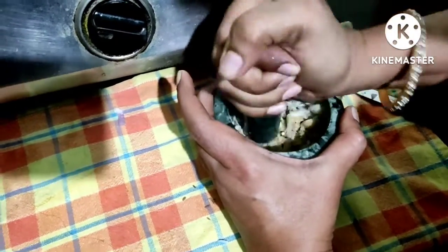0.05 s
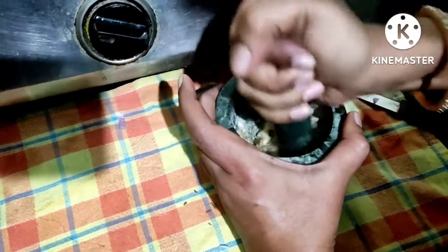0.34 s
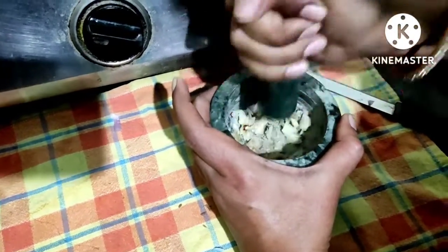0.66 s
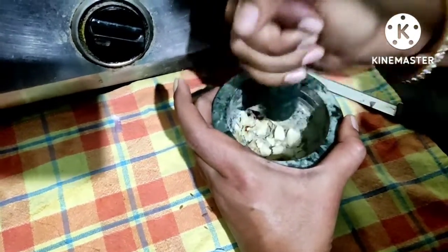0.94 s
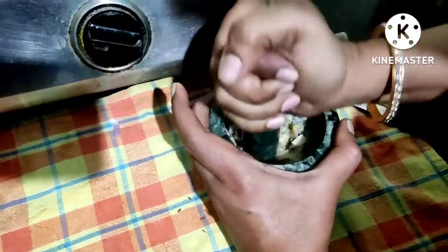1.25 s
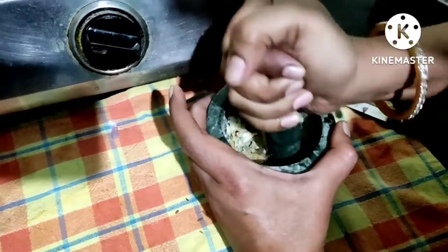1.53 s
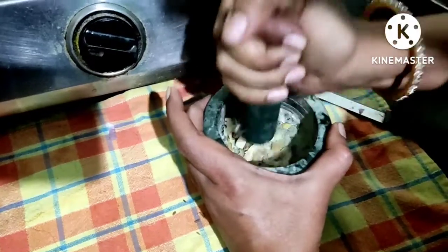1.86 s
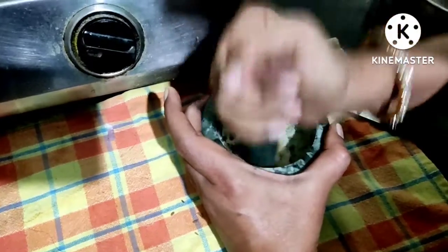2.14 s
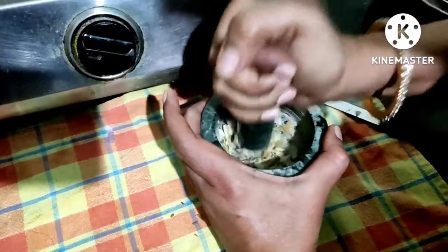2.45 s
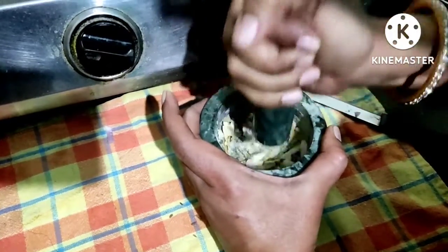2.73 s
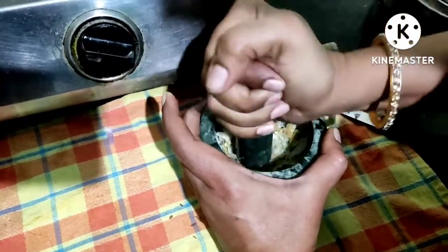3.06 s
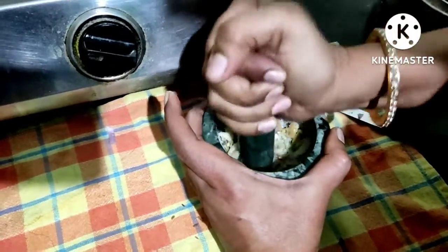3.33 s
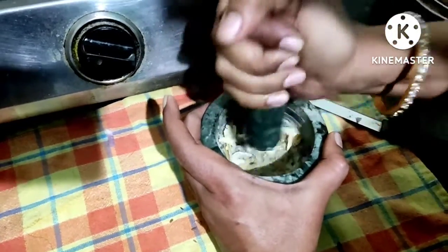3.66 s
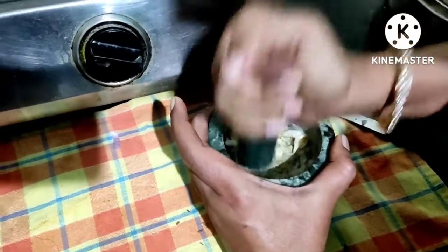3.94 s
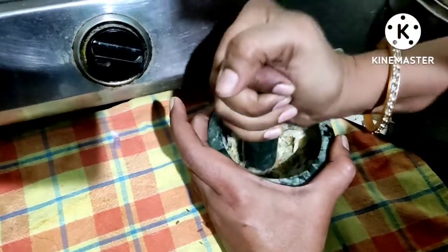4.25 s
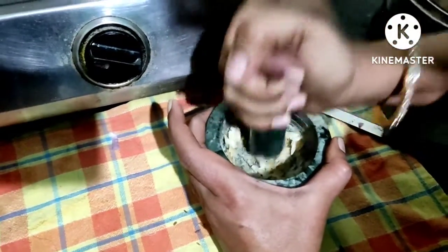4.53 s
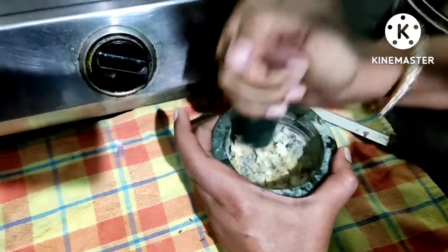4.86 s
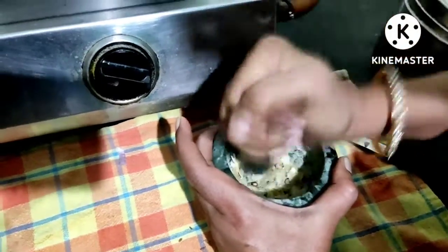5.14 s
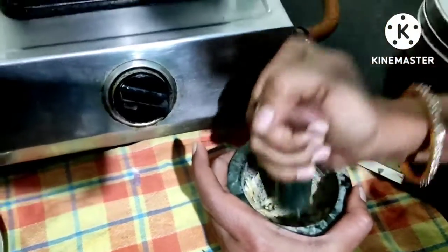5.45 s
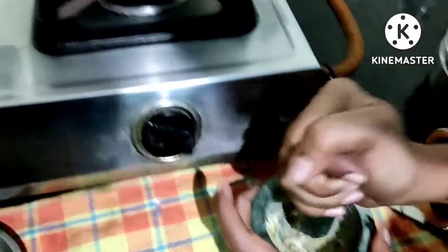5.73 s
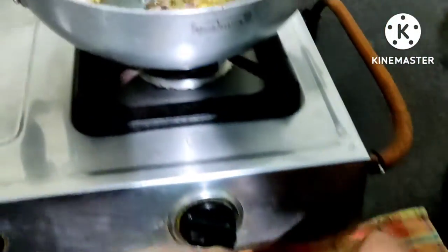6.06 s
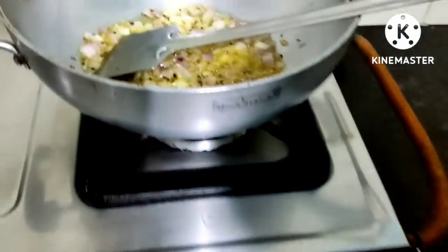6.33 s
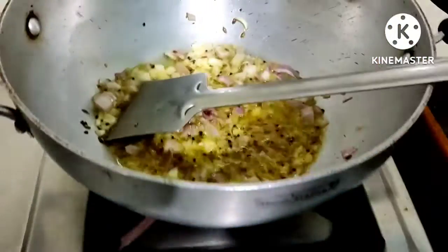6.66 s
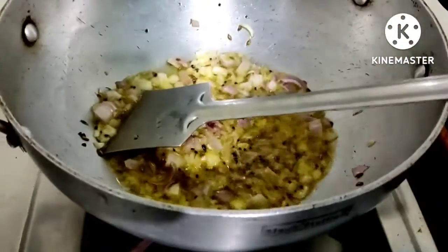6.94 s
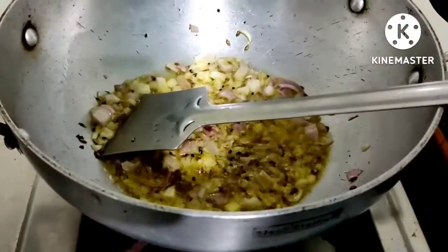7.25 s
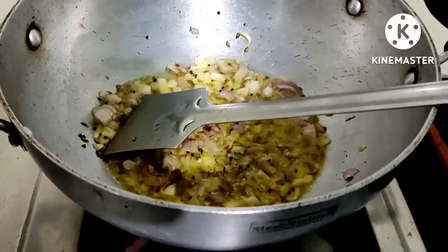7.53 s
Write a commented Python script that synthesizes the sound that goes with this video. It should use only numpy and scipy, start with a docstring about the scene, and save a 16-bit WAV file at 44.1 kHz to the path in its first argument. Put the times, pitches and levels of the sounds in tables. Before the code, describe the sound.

Close to a phone microphone in a small, hard-walled kitchen, garlic and ginger are crushed with a stone mortar and pestle in a quick, steady rhythm. Soft, moist thuds mix with sharper stone knocks, each leaving a short hollow ring. Onions fry quietly in oil in the background the whole time, growing slightly louder near the end as the pounding carries on over a faint low rumble.

```python
"""Thuds and wet squelches, about four a second: a stone pestle pounds garlic and ginger in a hand-held
stone mortar on a kitchen counter. Pulp cushions some blows; those that reach bare stone knock and clink,
and the small hard kitchen rings with them. Behind them onions sizzle in a pan over a low murmur of air.
It is all heard through a phone, whose limiter ducks everything after the hardest blows."""
import sys
import numpy as np
from scipy import signal
from scipy.fft import rfft, irfft
from scipy.io import wavfile
from scipy.ndimage import uniform_filter1d, minimum_filter1d

SR = 44100
rng = np.random.default_rng(int(sys.argv[2]) if len(sys.argv) > 2 else 0)


def materialize(psi):
    """Save the field psi as 16-bit PCM at rate SR to the path in sys.argv[1].

    A 1-D psi becomes a single channel; in a 2-D psi each row is a channel.
    """
    bounded = np.clip(np.atleast_2d(psi).T, -1, 1)
    quanta = np.round(bounded * 32767).astype(np.int16)
    wavfile.write(sys.argv[1], SR, quanta)


N = 343539
BLOW_T = np.arange(int(.6 * SR)) / SR  # seconds into one blow


def amp(db):
    """Decibels to gain."""
    return 10 ** (np.asarray(db) / 20)


def curve_at(points, hz):
    """Reads a curve drawn in straight lines over log frequency."""
    f, value = np.transpose(points)
    return np.interp(np.log(hz + 1), np.log(f), value)


def normalised(x):
    """Scales a short sound to the energy of 50 ms at level 1."""
    return x / np.sqrt(np.mean(np.sum(x ** 2, -1)) * 20 / SR)


def add(mix, s, sound):
    """Mixes a sound in at time s."""
    at = round(s * SR)
    sound = sound[:, max(-at, 0):]
    part = mix[:, max(at, 0):][:, :sound.shape[1]]
    part += sound[:, :part.shape[1]]


def delayed(x, s):
    """The same short sound, s seconds later."""
    return np.pad(x, ((0, 0), (round(s * SR), 0)))[:, :len(BLOW_T)]


def lowpass(x, hz):
    """Two-pole low-pass."""
    return signal.sosfilt(signal.butter(2, hz, fs=SR, output="sos"), x)


# how alike the two microphone ports hear a diffuse field: f/Hz, correlation
PORT_LIKENESS = [(30, 0.5), (80, 2), (130, 0.97), (300, 0.79), (640, 0.37), (1300, -0.12), (2200, 0.12),
                 (4000, 0)]
def diffuse(pair, spectrum):
    """Colours two unrelated signals and makes them as alike as a diffuse field does."""
    hz = np.fft.rfftfreq(pair.shape[1], 1 / SR)
    a, b = rfft(pair)
    likeness = np.clip(curve_at(PORT_LIKENESS, hz), -1, 1)
    mid, side = a * np.sqrt((1 + likeness) / 2), b * np.sqrt((1 - likeness) / 2)
    return irfft(np.array([mid + side, mid - side]) * amp(curve_at(spectrum, hz)), pair.shape[1])


def noise(spectrum, size):
    """Coloured stereo noise of level 1."""
    x = diffuse(rng.standard_normal((2, size)), spectrum)
    return x / x.std()


def ring(modes, rise_s, shift=1, sustain=1):
    """Dying sines; each reaches the two ports out of step by its own angle."""
    out = np.zeros((2, len(BLOW_T)))
    for k, (hz, db, t60) in enumerate(modes):
        angle = (-1) ** k * np.arccos(np.clip(curve_at(PORT_LIKENESS, hz), -1, 1)) / 2
        phase = 2 * np.pi * hz * shift * BLOW_T + np.array([[angle], [-angle]])
        out += amp(db - 60 * BLOW_T / (t60 * sustain)) * np.sin(phase)
    return normalised(out * (1 - np.exp(-BLOW_T / rise_s)))


def burst(spectrum, decay_ms, rise_ms, direct=0.81):
    """A short puff of tiny fractures; its direct path reaches the right port first."""
    ms = BLOW_T * 1000
    scattered, right = noise(spectrum, len(BLOW_T))
    left = direct * np.roll(right, 5) + np.sqrt(1 - direct ** 2) * scattered
    return normalised(np.array([left, right]) * np.exp(-ms / decay_ms) * (1 - np.exp(-ms / rise_ms)))


# colours of the kitchen air and of the handling rumble: f/Hz, level/dB
AIR_COLOUR = [(20, 28), (60, -63), (100, 12), (150, 32), (250, -35), (400, -15.5), (800, 2), (2000, -41)]
RUMBLE_COLOUR = [(12, -24), (25, -14), (35, 2), (48, -23), (65, -15), (120, -11.5), (400, -63)]
# fader ride on the rumble: t/s, level/dB
RUMBLE_RIDE = [(0.0, -59), (0.13, -56), (3.51, -49), (3.58, -43), (4.69, -44), (7.1, -41.5), (7.79, -49)]
def low_bed(air_db=-46):
    """The kitchen's low murmur of air and a rumble that grows as the phone moves to the stove."""
    rumble_db = np.interp(np.arange(N) / SR, *np.transpose(RUMBLE_RIDE))
    return amp(air_db) * noise(AIR_COLOUR, N) + amp(rumble_db) * noise(RUMBLE_COLOUR, N)


# colour of the hot oil: f/Hz, level/dB
SIZZLE_COLOUR = [(200, -54), (500, -4), (1000, -8.5), (2000, -7), (3000, -8), (4200, -7), (6000, -4.5),
                 (7500, -2.5), (8700, 6), (10000, 2), (11300, 3.5), (12600, -8), (14300, -9.5)]
def frying(pops_per_s=500, spread_db=4.5, pops_db=-10, turn_s=(6.2, 7.7), far_db=-36, near_db=-33):
    """A wash of small bubbles in the oil with larger pops, nearer as the phone turns to the pan."""
    ride_db = np.interp(np.arange(N) / SR, turn_s, [far_db, near_db])
    sizes = amp(spread_db * np.minimum(rng.exponential(1, (2, N)), 5))
    popping = rng.random(N) < pops_per_s / SR
    pops = diffuse(sizes * popping * rng.choice([-1, 1], (2, N)), SIZZLE_COLOUR)
    return amp(ride_db) * (noise(SIZZLE_COLOUR, N) + amp(pops_db) * pops / pops.std())


# length of the kitchen's reverb: f/Hz, t60/s
REVERB_DECAY = [(150, 0.75), (500, 0.36), (1300, 0.3343), (3000, 0.4), (6500, 0.22), (12000, 0.16)]
# its wet-over-dry balance: f/Hz, level/dB
REVERB_COLOUR = [(150, -11), (400, 8.5), (700, 7.5), (1300, 2.5), (3000, -4), (6500, -0.5), (12000, -1)]
def kitchen_reverb(x, walls, change=0.73, first_echo_s=0.0024):
    """Adds dense wall echoes, each band dying at its own speed; moving hands vary the pattern."""
    echoes = (walls + change * rng.standard_normal(walls.shape)) / np.hypot(1, change)
    hz, t, bands = signal.stft(diffuse(echoes, REVERB_COLOUR), SR, nperseg=256)
    rate = np.log(1000) / curve_at(REVERB_DECAY, hz)[:, None]
    dying = bands * np.exp(-rate * t) * np.sqrt(2 * rate / SR)
    tail = signal.istft(dying, SR, nperseg=256)[1][:, :len(BLOW_T)]
    tail *= np.clip(BLOW_T / first_echo_s - .5, 0, 1)
    return x + signal.fftconvolve(x[:1], tail, axes=1)[:, :len(BLOW_T)]


# the kitchen's hollow notes: f/Hz, level/dB, t60/s
HOLLOW_MODES = [(143.1, 8.5, 0.4), (156.4, 0.5, 0.32)]
def hollow_boom():
    """A hollow boom that swells in the kitchen after a blow."""
    return amp(-8) * ring(HOLLOW_MODES, rise_s=0.0098)


# kitchen modes that each knock wakes: f/Hz, level/dB, t60/s
KITCHEN_MODES = [(357.8, 11.5, 0.14), (402, -3, 0.19), (388, 4.5, 0.33), (414, 0.5, 0.11), (409.7, -2, 0.5),
                 (480, -13, 0.39), (485, 2, 0.47), (548, 4.5, 0.2), (645, -7.5, 0.86), (683, -2.5, 0.22),
                 (764, -6.5, 0.5), (820, 0, 0.27), (1040, 3, 0.24), (1008, -19, 0.91), (1130, -29, 0.41),
                 (1250, -10, 0.68)]
def kitchen_ring(hard_hz, hard_octaves, room=ring(KITCHEN_MODES, rise_s=0.011)):
    """The room rings with the blow, then dully again as the mortar rocks back onto the counter."""
    struck = amp(-5.5 + 3.2 * hard_octaves) * lowpass(room, hard_hz)
    settle = amp(-21 + 3.3 * hard_octaves) * lowpass(room, hz=616)
    return struck + delayed(settle, s=.102)


# the counter and the lowest kitchen modes: f/Hz, level/dB, t60/s
COUNTER_MODES = [(82, -29, 0.23), (99.6, 2.5, 0.38), (106.8, 6, 0.2), (132, -29, 1), (141.87, -6, 0.58),
                 (161.2, -8.5, 0.52), (198, -17, 1), (228.8, -1.5, 0.38), (233.5, -4, 0.32),
                 (249.4, 0.5, 0.32), (274, -9, 0.62)]
def counter_thud(hard_hz, glance_db, low_cut_hz=76, counter=ring(COUNTER_MODES, rise_s=0.0069)):
    """The counter's dull thud under a blow, with the deepest bass cut away."""
    thud = signal.sosfilt(signal.butter(4, low_cut_hz, "high", fs=SR, output="sos"), counter)
    return amp(-0.09 + .05 * glance_db) * lowpass(thud, hard_hz)


# colours of wet pulp, of a dry crack and of splitting garlic: f/Hz, level/dB
SQUELCH_COLOUR = [(1500, -60), (4000, -11.5), (6000, -11.5), (7500, -9.5), (8800, 3.5), (10000, -1),
                  (11300, 6.5), (12600, -16), (15000, 1)]
CRACK_COLOUR = [(800, -8.5), (2000, 1.5), (3100, 8.5), (4000, 1), (5200, -2), (7000, -9), (10000, -57),
                (15000, -42)]
SNAP_COLOUR = [(1500, -17.5), (4000, -8), (6500, -0.5), (9000, 7.5), (11300, -2), (12600, -2), (15000, -13)]
def crushed_pulp(wet_db, snap_s, halving_wet_db=3.5):
    """Pulp bursts, quicker when wet; a piece of garlic snaps and the fibres go on tearing."""
    squelch_ms = 1.8 * 2 ** (-wet_db / halving_wet_db)
    squelch = amp(wet_db - 1.9) * burst(SQUELCH_COLOUR, decay_ms=squelch_ms, rise_ms=1.5)
    crunch = amp(-22.5) * burst(CRACK_COLOUR, decay_ms=26, rise_ms=23)
    snap = amp(wet_db - 10.5) * burst(SNAP_COLOUR, decay_ms=1, rise_ms=0.14)
    return squelch + crunch + delayed(snap, snap_s)


# cues for the wet swishes: t/s, length/s, level/dB
BRUSH_CUES = [(1.272, 0.076, -28), (1.534, 0.027, -29), (4.026, 0.099, -31), (6.631, .07, -25.5)]
def wall_brushes():
    """The pestle brushes the mortar's wet wall as it passes."""
    out = np.zeros((2, N))
    for s, length_s, db in BRUSH_CUES:
        size = int(length_s * SR)
        add(out, s, amp(db) * noise(SQUELCH_COLOUR, size) * np.hanning(size))
    return out


# the mortar, damped by the hand around it, and the pestle: f/Hz, level/dB, t60/s
MORTAR_MODES = [(340, -4, 0.014), (464, -4, 0.027), (698, -0.5, 0.013), (867, 0.5, 0.015), (986, 2, 0.012),
                (1276, 3, 0.024), (1447, 1.5, 0.018), (1614, -2.5, 0.013), (1920, -5, 0.026),
                (2476, 0, 0.012), (2700, -22, 0.012)]
PESTLE_MODES = [(3490, 6.5, 0.003), (6040, 3, 0.016), (6572, 26, 0.023), (7150, 18, 0.011)]
def stone_strike(hard_hz, hard_octaves, glance_db, clink=ring(PESTLE_MODES, rise_s=0.0001)):
    """Stone meets stone: pulp lengthens the contact and dulls the knock; a glancing blow clinks."""
    spot = 1 + 0.039 * rng.standard_normal()  # grip and landing spot detune the mortar
    sustain = 2 ** (-glance_db / 12.5)  # a square blow rings longest
    knock = lowpass(ring(MORTAR_MODES, rise_s=0.0007, shift=spot, sustain=sustain), hard_hz)
    crack = burst(CRACK_COLOUR, decay_ms=4.3, rise_ms=0.092)
    return (amp(-3.5 + 4.1 * hard_octaves - 0.13 * glance_db) * knock
            + amp(-17 + 12.67 * hard_octaves + 0.13 * glance_db) * crack
            + amp(-21.5 + 11 * hard_octaves + 0.92 * glance_db) * clink)


# one cue a blow: t/s, force/dB, contact hardness/Hz, glance off the wall/dB, pulp wetness/dB
BLOW_CUES = [ (-.07, -20.5, 2280, 6, -5), (.108, -43.5, 4900, 8.5, 8), (0.1475, -23, 3160, 7, -3),
             (.386, -22.5, 3140, 4.5, -3), (0.6209, -24, 430, 6, -0.5), (0.8754, -23, 292, -14, -3.5),
             (1.119, -23, 370, 14, 0), (1.351, -22, 2320, 0, 10.5), (1.5937, -20.5, 395, -4, 0),
             (1.8237, -19.5, 2700, -2, -2), (2.0493, -18.5, 790, -9.5, -4), (2.279, -25.5, 480, 0, -8.5),
             (2.4898, -24.5, 322, 0, -0.5), (2.6898, -18.5, 760, -6, -3.5), (2.9165, -20, 1850, 2.5, -1),
             (3.1461, -17.5, 540, -2, -4.5), (3.378, -16.5, 2350, -14, -3.5), (3.617, -17, 2130, 4, -3.5),
             (3.8525, -17, 2080, -15.5, -9), (4.084, -26, 2220, -13.5, -6), (4.311, -17, 2500, -6, -1),
             (4.5445, -17.5, 2410, -11.5, -2), (4.7899, -20, 2480, 15, 2), (5.036, -27.5, 2000, -6, -2.5),
             (5.2672, -16, 2740, 2.5, -1), (5.4863, -27, 474, -11, 2.5), (5.725, -19.5, 374, 10, -0.5),
             (5.946, -20, 1070, -1.5, -9.5), (6.1652, -25.5, 277, -7, 1), (6.3985, -19, 830, 0, -3.5),
             (6.6168, -17.5, 440, 0, -10), (6.8387, -23, 390, -7, -2.5), (7.051, -30, 372, 11, 2),
             (7.268, -19.5, 2500, 1.5, -4), (7.493, -19.5, 2460, 0.5, -3.5), (7.714, -29, 2960, 15.5, 6.5)]
def pounding(squelch_lead_s=.0017, boom_lag_s=.087, middling_hz=1000):
    """Each blow bursts the pulp just before the pestle bottoms out and shakes counter and room."""
    out = np.zeros((2, N))
    walls = rng.standard_normal((2, len(BLOW_T)))  # the mortar stays put: one basic echo pattern
    boom = hollow_boom()
    for s, force_db, hard_hz, glance_db, wet_db in BLOW_CUES:
        force = amp(force_db)
        hard_octaves = np.log2(hard_hz / middling_hz)
        stone = delayed(stone_strike(hard_hz, hard_octaves, glance_db), squelch_lead_s)
        pulp = crushed_pulp(wet_db, snap_s=squelch_lead_s)
        body = delayed(counter_thud(hard_hz, glance_db) + kitchen_ring(hard_hz, hard_octaves),
                       squelch_lead_s)
        add(out, s - squelch_lead_s, force * (kitchen_reverb(pulp + stone, walls) + body))
        add(out, s + boom_lag_s, force * boom)
    return out


def scene():
    """Mortar and pestle up front, the pan and the room behind."""
    return pounding() + wall_brushes() + frying() + low_bed()


def limiter(x, ceiling_db=-9.5, hold_s=0.074, recover_db_per_s=520, sense_hz=13000):
    """Looks a few ms ahead, ducks the louder port's peaks to the ceiling, holds, then lets go fast."""
    power = uniform_filter1d(lowpass(x, sense_hz) ** 2, size=50).max(0)
    over_db = np.maximum(10 * np.log10(abs(power) + 1e-12) - ceiling_db, 0)
    hold = int(hold_s * SR) // 2 * 2 + 1
    held_db = -minimum_filter1d(-over_db, hold, origin=hold // 2, mode="constant")
    recovery_db = np.arange(N) * recover_db_per_s / SR
    duck_db = np.maximum.accumulate(held_db + recovery_db) - recovery_db
    ahead_db = -minimum_filter1d(-duck_db, size=650)
    return x * amp(-uniform_filter1d(ahead_db, size=200))


# balance of the microphone ports, left over right: f/Hz, level/dB
PORT_BALANCE = [(100, 2.5), (700, 0.1), (1500, 0.5), (4400, 1), (8500, -6.5), (10500, 3), (12500, 16.5),
                (15000, 2)]
def record(dry, top_hz=14450):
    """The phone: two unequally coloured ports, the limiter and a steep high cut."""
    tilt_db = curve_at(PORT_BALANCE, np.fft.rfftfreq(N, 1 / SR)) / 2
    coloured = irfft(rfft(dry) * amp(np.array([tilt_db, -tilt_db])), N)
    high_cut = signal.firwin(401, top_hz, window=("kaiser", 8), fs=SR)
    return signal.oaconvolve(limiter(coloured), high_cut[None], "same")


dry = scene()
out = record(dry)
materialize(out)
```